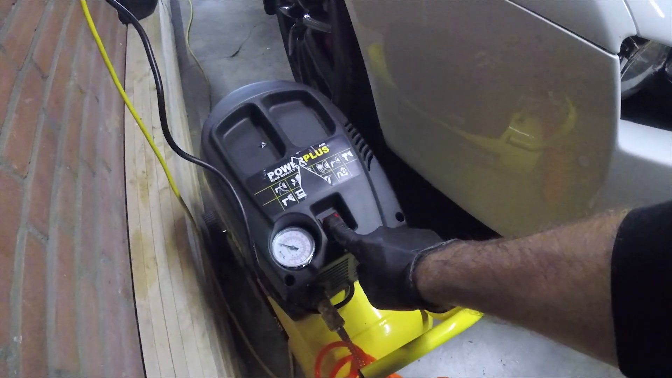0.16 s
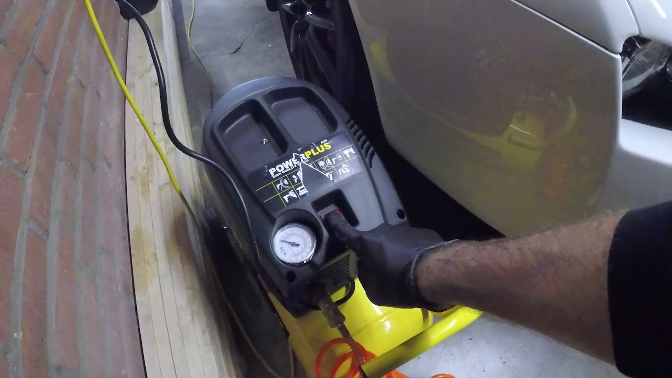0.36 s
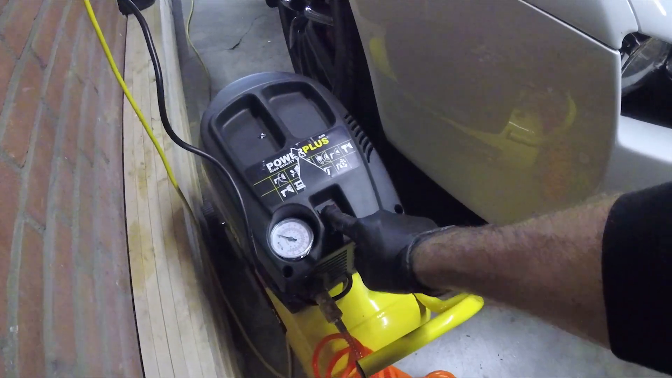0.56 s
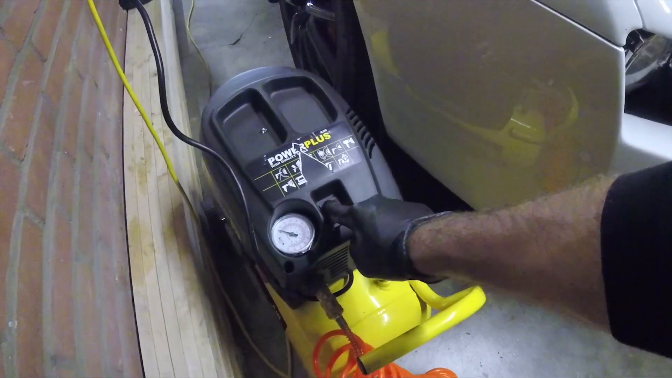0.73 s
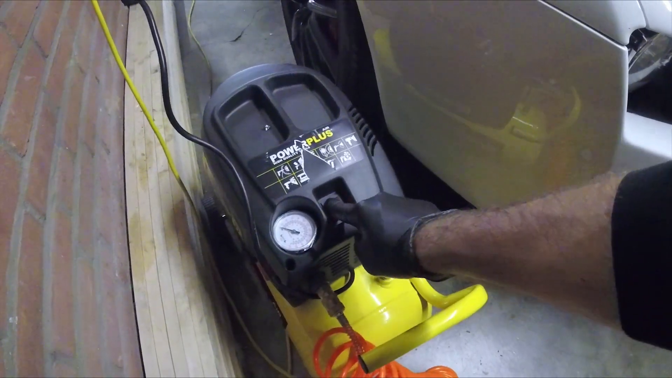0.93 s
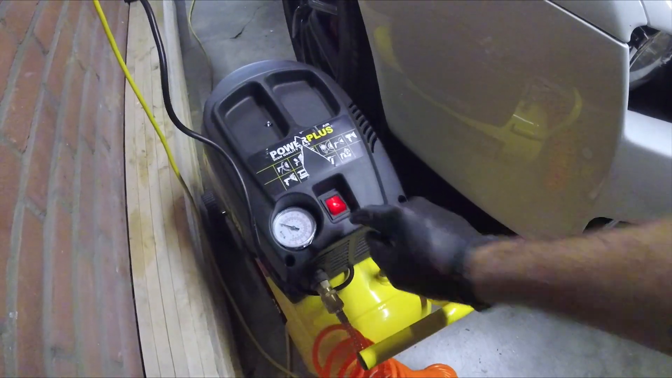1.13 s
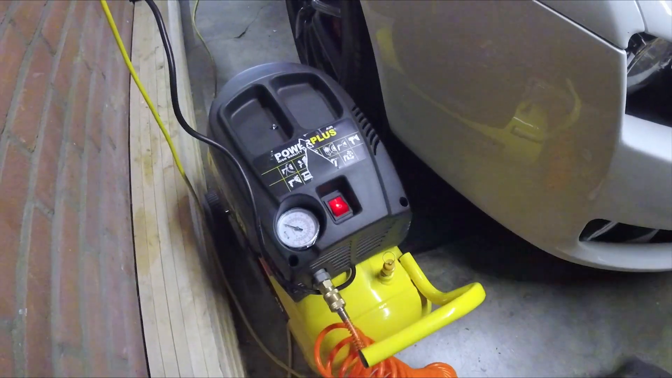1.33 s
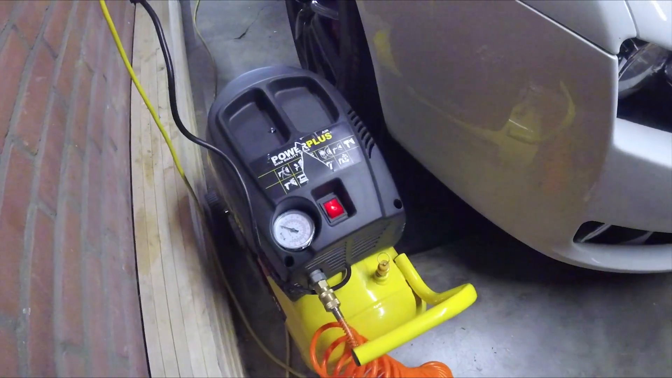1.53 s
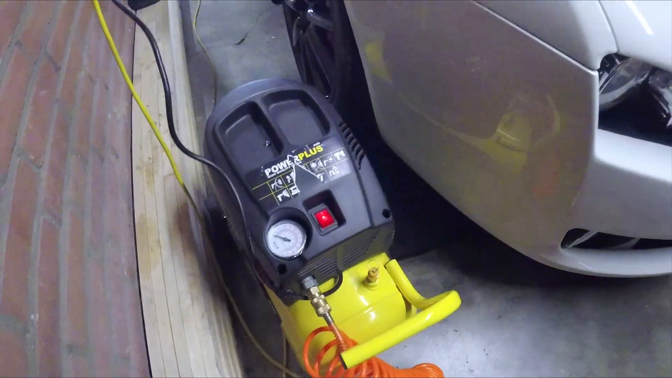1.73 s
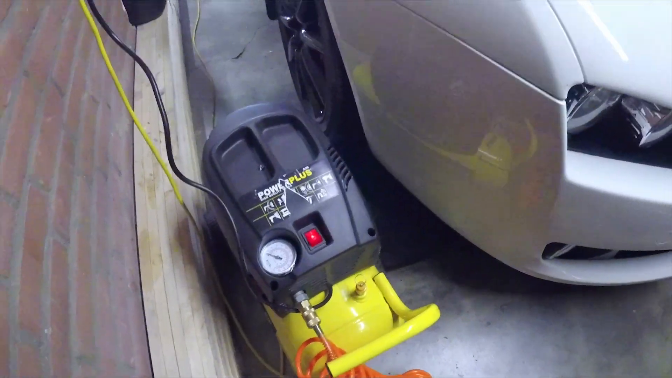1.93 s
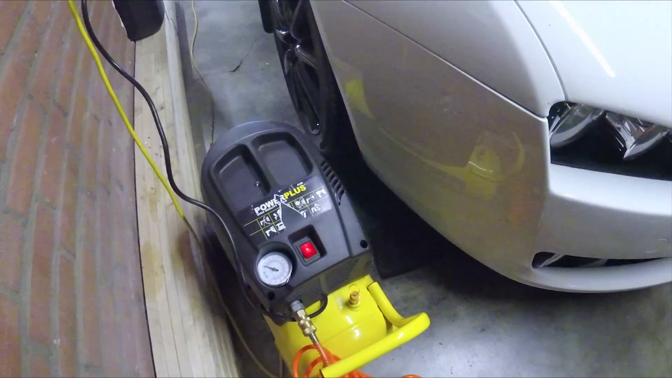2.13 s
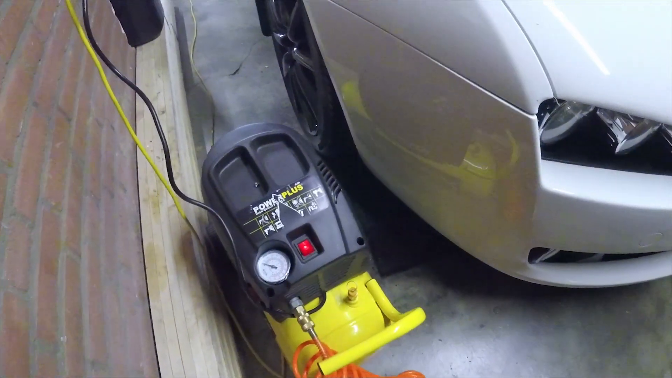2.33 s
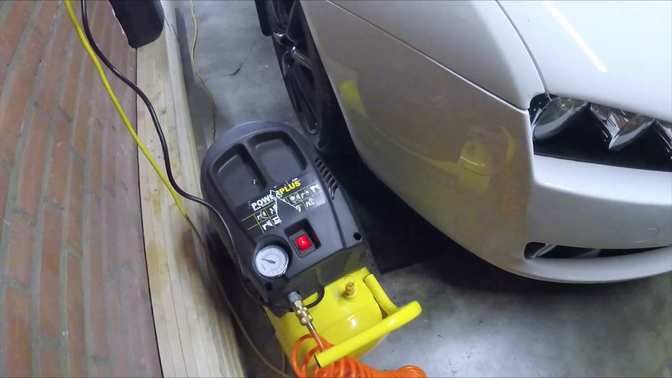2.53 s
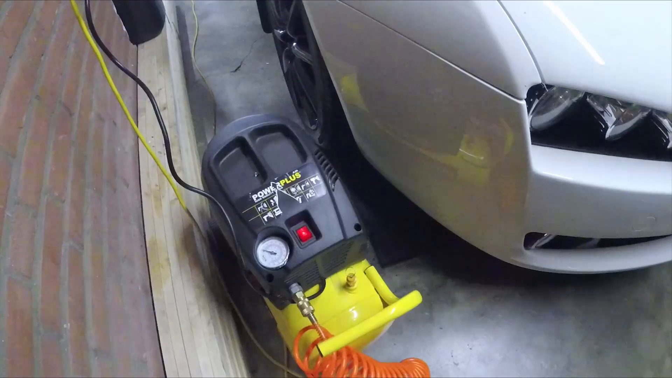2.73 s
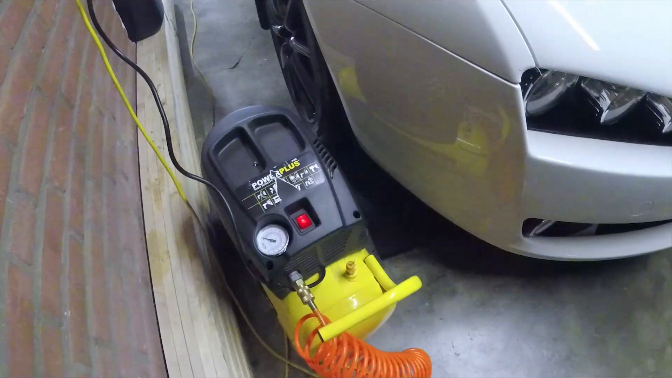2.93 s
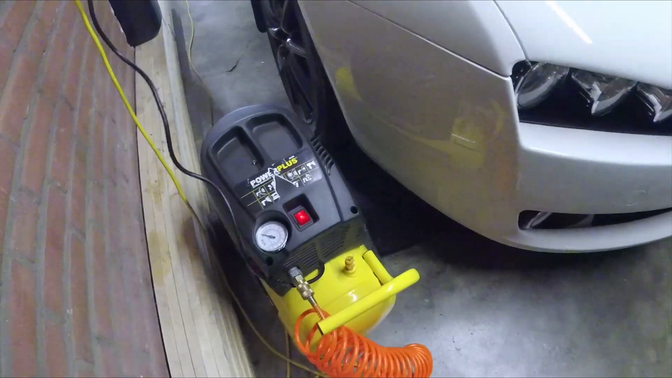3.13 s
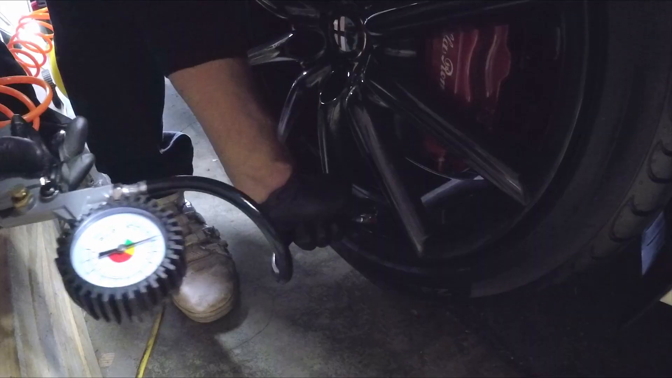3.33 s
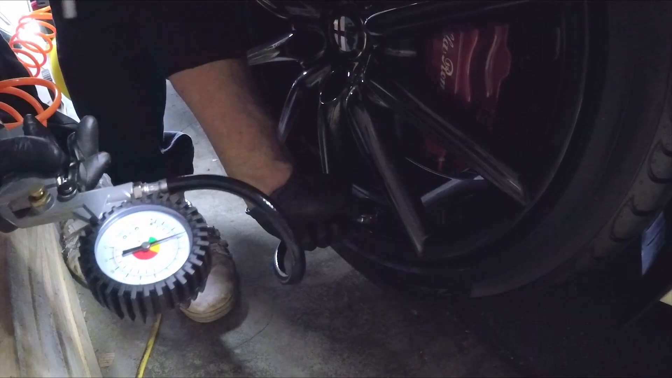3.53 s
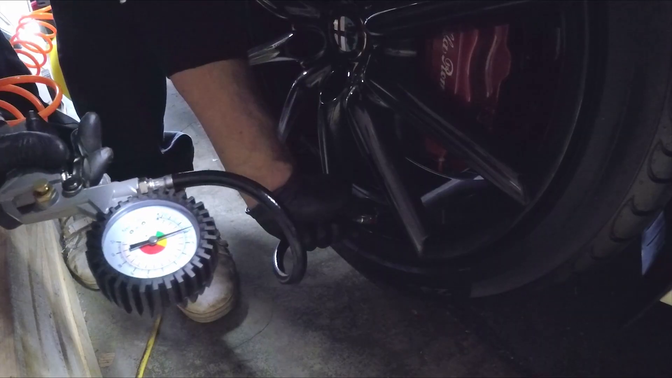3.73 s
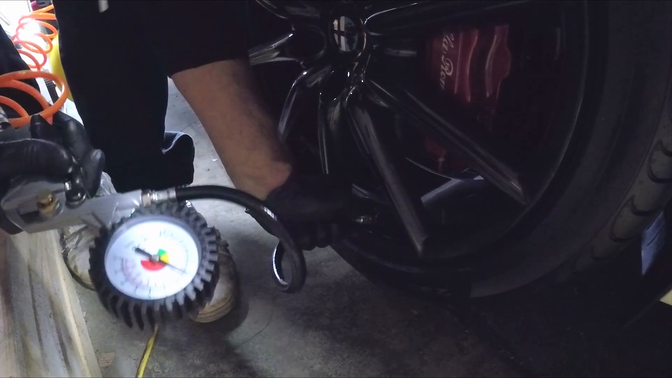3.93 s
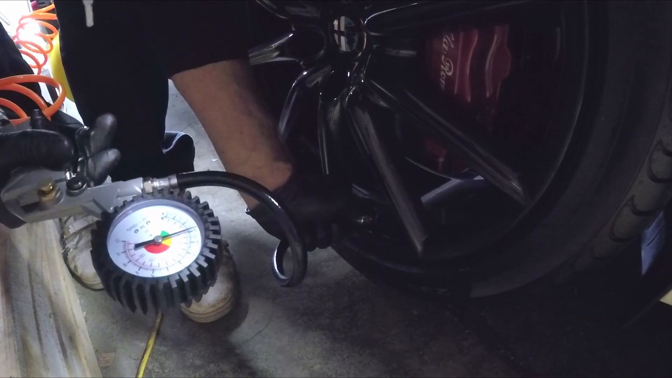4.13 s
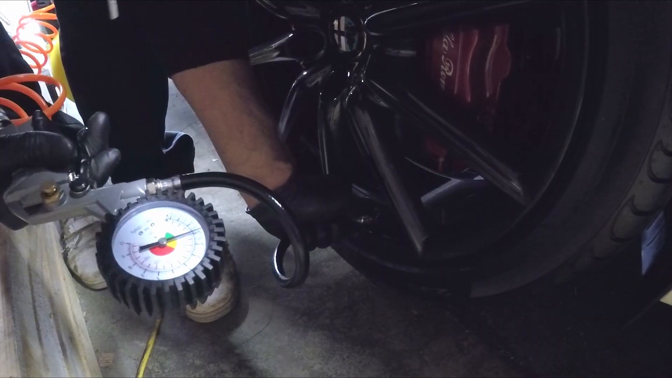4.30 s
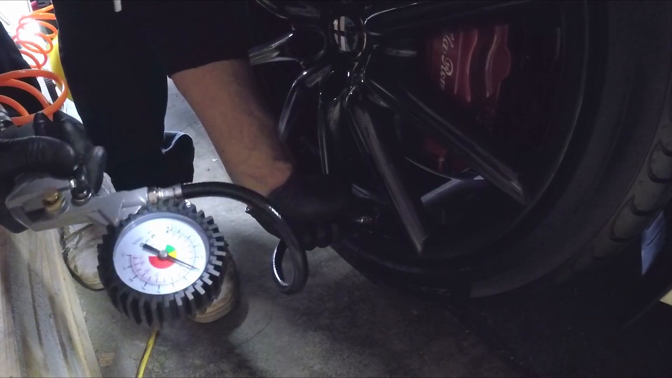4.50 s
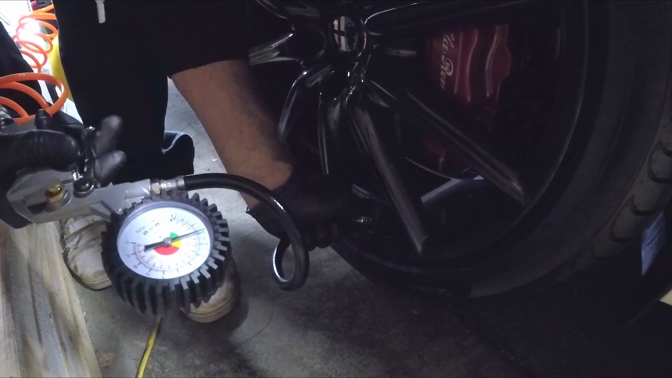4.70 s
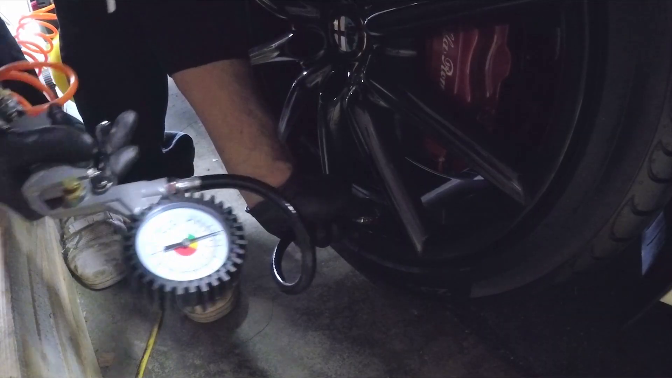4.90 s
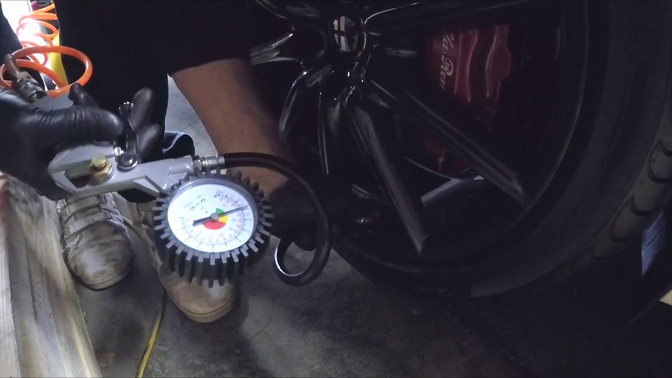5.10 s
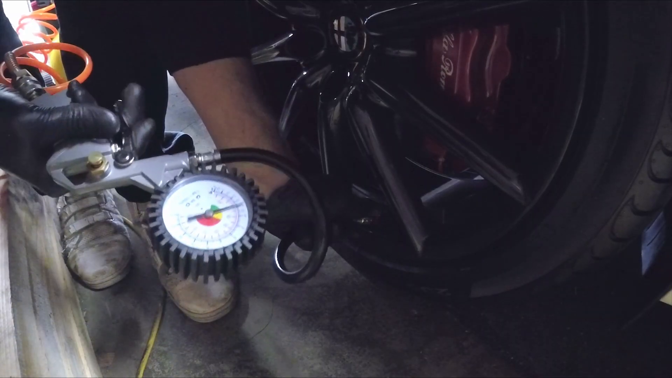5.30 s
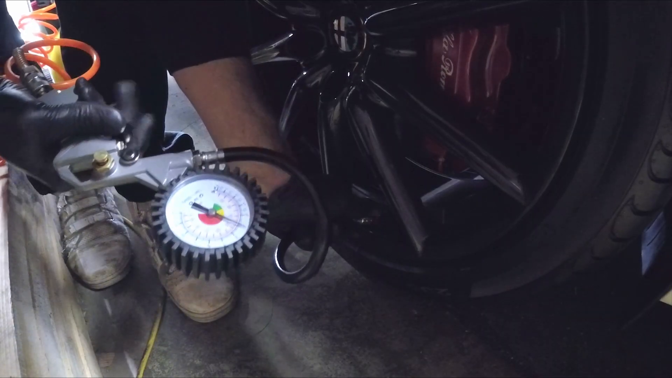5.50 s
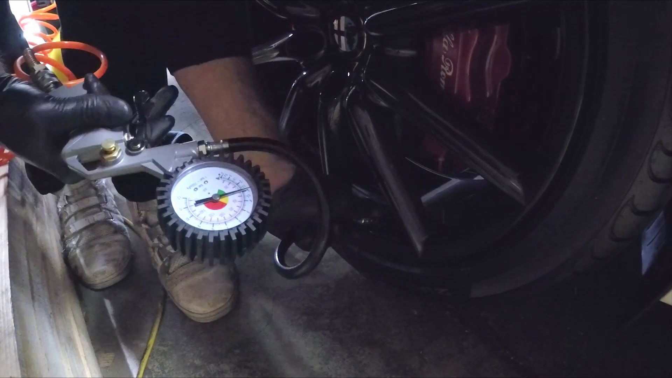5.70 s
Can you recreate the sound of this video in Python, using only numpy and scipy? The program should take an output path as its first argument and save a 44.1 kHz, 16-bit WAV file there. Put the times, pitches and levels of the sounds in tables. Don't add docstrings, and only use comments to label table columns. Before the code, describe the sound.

A gloved hand clicks a switch, a small piston compressor roars into a rattling drone, then cuts abruptly to three short hisses of air into a tyre.

```python
import sys
import numpy as np
from scipy import signal
from scipy.fft import rfft, irfft
from scipy.io import wavfile
from scipy.ndimage import map_coordinates

SR = 44100
rng = np.random.default_rng(int(sys.argv[2]) if len(sys.argv) > 2 else 0)


def elevation(decibels):
    levels = np.asarray(decibels, float)
    return 10 ** (levels / 20)


def unload_wav(signal):
    wavfile.write(
        sys.argv[1],
        SR,
        np.round(np.clip(np.atleast_2d(signal).T, -1, 1) * 32767).astype(np.int16),
    )


N = 253575
TIME = np.arange(N) / SR
START_S, CUT_S = .602, 3.3665


def rms_one(x):
    return x / np.sqrt(np.mean(x ** 2) + 1e-20)


def in_time(rows):
    s, *columns = np.transpose(rows)
    return [np.interp(TIME, s, c) for c in columns]


def level(rows):
    return elevation(in_time(rows)[0]) * (TIME >= rows[0][0]) * (TIME <= rows[-1][0])


def bump(at_s, width_s):
    return np.exp(-((TIME - at_s) / width_s) ** 2)


def drift(rate):
    r = np.exp(-80 * np.pi * rate / SR)
    slow = signal.lfilter([1], [1, -2 * r, r * r], rng.standard_normal(N // 40 + 2002))[2000:]
    return np.interp(np.arange(N) / 40, np.arange(len(slow)), rms_one(slow))


def ring(x, hz, t60):
    r = elevation(-60 / (t60 * SR))
    w = 2 * np.pi * hz / SR
    return signal.lfilter([0, np.sin(w)], [1, -2 * r * np.cos(w), r * r], x + 1e-18)


def narrow(hz, width_hz):
    return rms_one(ring(rng.standard_normal(N), hz, np.log(1000) / (np.pi * width_hz)))


def coloured(spectrum, white=None):
    if white is None:
        white = rng.standard_normal(N)
    hz = np.fft.rfftfreq(N, 1 / SR)[1:]
    points = np.array(spectrum)
    shape = elevation(np.interp(np.log(hz), np.log(points[:, 0]), points[:, 1], left=-90, right=-90))
    return rms_one(irfft(rfft(white) * np.r_[0, shape], N))


def above(x, hz):
    return signal.sosfiltfilt(signal.butter(2, hz, "high", fs=SR, output="sos"), x)


# (frequency [Hz], level [dB per Hz])
RUMBLE_TONES = [
    [(2, 22), (7, 23), (16, -2), (45, 2.5), (80, -2), (125, -20), (250, -25), (600, -48)],
    [(4, 14.5), (9, 8.5), (22, -4), (50, 0), (110, -4), (200, -12.5), (350, -18), (600, -34.5)],
]
# (frequency [Hz], level [dB per Hz])
FLOOR = [(150, -32), (250, -4.5), (330, -9.5), (407, -3.5), (1500, -10), (2020, -11.5), (4820, -15.5),
         (13700, -20.5), (16000, -30.5)]
RUMBLE_DB, HISS_DB = (-50, -68), (-79.5, -74.5)
GUST_S, GUST_LENGTH_S, GUST_DB = 5.53, 0.078, 9
HISS_TOP_HZ = 12100


def garage():
    scenes = [TIME < CUT_S, TIME >= CUT_S]
    rumble = sum(on * elevation(db) * coloured(tone) for on, db, tone in zip(scenes, RUMBLE_DB, RUMBLE_TONES))
    rumble *= elevation(1.1 * drift(10.0) + GUST_DB * bump(GUST_S, GUST_LENGTH_S))
    glove = level([(.395, -74), (.55, -76.5)]) * narrow(610, 70)
    hiss = coloured(FLOOR)
    dull = signal.sosfilt(signal.ellip(6, 1, 40, HISS_TOP_HZ, fs=SR, output="sos"), hiss)
    return rumble + glove + np.where(scenes[0], elevation(HISS_DB[0]) * dull, elevation(HISS_DB[1]) * hiss)


# (time [s], peak level [dB], centre [Hz], t60 [s])
GLOVE = [
    (.007, -48, 2300, 0.018),
    (.217, -58.5, 3380, .035),
    (.2425, -67, 3900, .02),
    (0.392, -43, 2780, 0.029),
    (.398, -57, 2400, .12),
    (.528, -65, 7500, 0.015),
]
# (time [s], peak level [dB], lowest frequency [Hz], rise [s], t60 [s])
SNAPS = [
    (0.551, -25, 1000, .0011, .023),
    (3.787, -39, 2060, 0.0041, 0.043),
]
GLOVE_RISE_S, GLOVE_SPREAD = 0.0011, 1.53


def ticks():
    out = np.zeros(N)
    since = np.arange(SR // 8) / SR
    bursts = [(s, db, hz / GLOVE_SPREAD, hz * GLOVE_SPREAD, GLOVE_RISE_S, t60) for s, db, hz, t60 in GLOVE]
    bursts += [(s, db, low_hz, 15000, rise, t60) for s, db, low_hz, rise, t60 in SNAPS]
    for s, db, low_hz, high_hz, rise, t60 in bursts:
        band = signal.butter(2, [low_hz, high_hz], "band", fs=SR, output="sos")
        noise = signal.sosfilt(band, rng.standard_normal(len(since)))
        shape = np.minimum(since / rise, elevation(-60 * (since - rise) / t60))
        out[round(s * SR):][:len(since)] += elevation(db - 0.5) * shape * noise
    return out


# (time [s], peak level [dB], frequency [Hz], t60 [s])
KNOCKS = [
    (.6, -34, 2450, .2),
    (.662, -29, 2830, .18),
    (3.787, -45, 75, .07),
    (3.79, -52, 200, .04),
    (4.335, -67, 730, .12),
    (4.57, -52, 2540, .52),
    (5.25, -66, 730, .14),
    (5.49, -47.5, 2840, .33),
]
# (time [s], peak level [dB], frequency [Hz])
STOPS = [
    (3.899, -48, 590),
    (4.435, -46.5, 600),
    (5.403, -43.5, 594),
]
STOP_T60_S, STOP_OVERTONE, STOP_OVERTONE_DB = .021, 2.2, -11
KNOCK_RISE_SHARE = .062


def knocks():
    out = np.zeros(N)
    stops = [(s, db, hz, STOP_T60_S) for s, db, hz in STOPS]
    stops += [(s, db + STOP_OVERTONE_DB, hz * STOP_OVERTONE, STOP_T60_S) for s, db, hz in STOPS]
    for s, db, hz, t60 in KNOCKS + stops:
        since = np.maximum(TIME - s, 0)
        rise = np.minimum(since / (KNOCK_RISE_SHARE * t60), 1)
        out += elevation(db - 60 * since / t60) * rise * np.sin(2 * np.pi * hz * since)
    return out


JET_FALL_DB_PER_S, JET_SHOULDER_S = 283, 0.018


def trigger(opens, shuts, db, rise):
    late = JET_SHOULDER_S * np.logaddexp(0, (TIME - shuts) / JET_SHOULDER_S)
    return elevation(db - JET_FALL_DB_PER_S * late) * (1 - np.exp(-np.maximum(TIME - opens, 0) / rise)) ** 2


# (frequency [Hz], width [Hz], level [dB])
WHEEL = [(2540, 26, -15), (2840, 27, -5), (2990, 25, -5), (3220, 23, -7), (3360, 25, -12), (3560, 23, -15),
         (4600, 41, -13), (5150, 56, -13), (5600, 45, -14), (6190, 26, -13), (6830, 160, -10),
         (7320, 39, 0), (7740, 42, -3), (7890, 24, -8), (8230, 32, -3), (8600, 21, -7), (8760, 70, -6),
         (9180, 30, -11), (9870, 57, -13), (10500, 140, -15), (11100, 38, -16), (11600, 34, -12),
         (12100, 45, -9), (12800, 54, -15), (13200, 37, -18), (13600, 100, -15), (13900, 37, -13),
         (14400, 34, -17)]
LOW_MODES_HZ = 4000


def wheel_modes(flow):
    out = 0
    for hz, width, db in WHEEL:
        t60 = np.log(1000) / (np.pi * (.45 if hz < LOW_MODES_HZ else .8) * width)
        driven = ring(flow * rng.standard_normal(N) * elevation(2.2 * drift(3)), hz, t60)
        out = out + elevation(db) * driven * np.sqrt(width / t60 / SR)
    return out


CROWD_T60_S, CROWD_SPREAD_DB = .2, 4


def tyre_air(jet):
    hz = np.geomspace(2300, 14500, 60) * (1 + .015 * rng.standard_normal(60))
    t60 = CROWD_T60_S * (LOW_MODES_HZ / hz) ** .5 * elevation(CROWD_SPREAD_DB * rng.uniform(-1, 1, 60))
    crowd = sum(ring(jet, f, t) / np.sqrt(t) for f, t in zip(hz, t60))
    return crowd * np.std(jet) / np.std(crowd)


# (opens [s], shuts [s], level [dB], rise [s])
JETS = [
    (3.775, 4.045, -45, 0.044),
    (4.363, 4.624, -46, 0.026),
    (5.285, 5.536, -44.5, 0.034),
]
# (frequency [Hz], level [dB per Hz])
JET = [(530, -50), (900, -23.5), (1920, -19), (2890, -10), (3550, -8.5), (4860, -7.5), (5100, -6),
       (6890, -10), (7490, -0.5), (9770, -9), (14200, -8), (15400, -6), (16000, -41)]
BRIGHT_FROM_HZ, BRIGHT_SHARE = 9500, .35


def inflator():
    flow = sum(trigger(*pull) for pull in JETS)
    jet = flow * coloured(JET) * elevation(0.9 * drift(40))
    hiss = elevation(-5.5) * jet + elevation(-7.5) * tyre_air(jet) + elevation(-7) * wheel_modes(flow)
    return hiss - above(hiss, BRIGHT_FROM_HZ) * (1 - (flow / flow.max()) ** BRIGHT_SHARE)


def window(angle, start, length, edge):
    since = (angle - start) % 1
    return np.clip(np.minimum(since, length - since) / edge, 0, 1)


def strikes(turns, at, uneven_db):
    passed = np.diff(np.floor(turns - at), prepend=np.floor(turns[0] - at)) > 0
    return passed * elevation(uneven_db * rng.standard_normal(N))


def each_turn(turns):
    return rng.standard_normal(int(turns[-1]) + 1)[turns.astype(int)]


RUNNING_SPEED, FAST_LAG, FAST_S, SLOW_LAG, SLOW_S = 65.18, 29.5, .084, 3.3, .58
FEET_DRAG, FEET_DRAG_AT_S, FEET_DRAG_S = 1.7, .85, .095


def crank_speed():
    since = np.maximum(TIME - START_S, 0)
    speed = RUNNING_SPEED - FAST_LAG * np.exp(-since / FAST_S) - SLOW_LAG * np.exp(-since / SLOW_S)
    return speed - FEET_DRAG * bump(FEET_DRAG_AT_S, FEET_DRAG_S)


SHAKE_DB, SHAKE_DB_PER_OCTAVE, SHAKE_START_DB = -32, 10.5, -6.5
FEET_DB, FEET_AT_S, FEET_S = 5, .835, 0.13


def body_shake(turns, speed, first):
    db = SHAKE_DB + SHAKE_DB_PER_OCTAVE * np.log2(speed / RUNNING_SPEED)
    db += FEET_DB * bump(FEET_AT_S, FEET_S) + SHAKE_START_DB * first
    return elevation(db + 5.5) * np.sin(2 * np.pi * (turns + .04))


INTAKE_T60_S = 0.21
INTAKE_HZ, INTAKE_RISE_HZ, INTAKE_RISE_S = 422.5, 45, .085


def intake_ring(turns, since_open, valve_open):
    hz = INTAKE_HZ - INTAKE_RISE_HZ * np.exp(-np.maximum(TIME - START_S, 0) / INTAKE_RISE_S)
    gain = elevation(7.0 - 60 * since_open / INTAKE_T60_S + .5 * each_turn(turns))
    tone = gain * np.sin(2 * np.pi * hz * since_open)
    return signal.lfilter(*signal.iirnotch(585, 8, fs=SR), tone * valve_open)


FLUTTER_HZ, FLUTTER_RISE_HZ, FLUTTER_RISE_S = 850, 112, .13
FLUTTER_DB, FLUTTER_DB_PER_S, FLUTTER_SEATED_DB = -25.5, -56, -61
RATTLE_DB, RATTLE_SEATED_DB = -32, -46
SEATED_FROM_S, SEATED_BY_S = .86, 0.98


def reed_flutter(turns, since_open):
    since = np.maximum(TIME - START_S, 0)
    seated = np.clip((TIME - SEATED_FROM_S) / (SEATED_BY_S - SEATED_FROM_S), 0, 1)
    flutter_db = (1 - seated) * (FLUTTER_DB + FLUTTER_DB_PER_S * since) + seated * FLUTTER_SEATED_DB
    rattle_db = (1 - seated) * RATTLE_DB + seated * RATTLE_SEATED_DB
    hz = FLUTTER_HZ - FLUTTER_RISE_HZ * bump(START_S, FLUTTER_RISE_S)
    phase = 2 * np.pi * hz * since_open + 0.38 * each_turn(turns)
    flutter = elevation(flutter_db + 2.5 + 1.1 * drift(60)) * np.sin(phase)
    rattle = narrow(750, 220) + .8 * narrow(1030, 250) + .5 * narrow(300, 150)
    return flutter + elevation(rattle_db) * rattle


# (multiple of crank speed, level [dB against intake ring])
PUSH = [(2, -6), (3, -21.5), (4, -6.5)]


def pressure_push(turns):
    return sum(elevation(db + 0.51 * drift(1.8)) * np.sin(2 * np.pi * k * (turns + 0.0033)) for k, db in PUSH)


# (multiple of crank speed, level [dB])
SNAP = [(8, -10), (10, -11), (11, -10), (12, -9.5), (13, -6.5), (14, -3.5), (15, -6.5), (16, -15),
        (17, -37), (18, -26), (19, -13)]


def valve_snap(turns):
    out = 0
    for k, db in SNAP:
        phase = 2 * np.pi * k * (turns - .625) - .9 + 0.49 * drift(5.5)
        out = out + elevation(db - 4.0 + 1.0 * drift(2.0)) * np.cos(phase)
    return out


# (frequency [Hz], level [dB], t60 [s])
CASING = [(1013.8, 2.5, 0.059), (1338, -1, 0.077), (1489, -5, 0.057), (1847, -7.5, 0.035)]
SHUT_AT_TURNS = .6


def casing_knock(turns):
    return sum(elevation(db) * ring(strikes(turns, SHUT_AT_TURNS, 2.0), hz, t60) for hz, db, t60 in CASING)


# (frequency [Hz], level [dB per Hz])
CLATTER = [(30, -24.5), (70, -18), (160, -25.5), (320, -13.5), (560, -10), (740, -8), (820, -19.5),
           (1000, -17), (1250, -9), (1550, -13), (2200, -16.5), (5000, -24.5), (10500, -31), (16000, -29)]
# (frequency [Hz], width [Hz], level [dB])
WHINES = [(3690, 45, -22), (3330, 350, -14), (4000, 350, -17), (8000, 1800, -14), (14150, 350, -23)]
DULL_START_S, DULL_ABOVE_HZ, DULL_SHARE = .2, 9500, .55


def mechanical_clatter():
    clatter = coloured(CLATTER)
    clatter += sum(elevation(db + 3.1 * drift(1.1)) * narrow(hz, width) for hz, width, db in WHINES)
    return clatter - DULL_SHARE * bump(START_S, DULL_START_S) * above(clatter, DULL_ABOVE_HZ)


def contacts(turns, turns_alike):
    surface = rng.standard_normal((40, 680))
    return map_coordinates(surface, [turns / turns_alike % 39, turns % 1 * 680], order=1, mode="wrap")


def repeated_clatter(turns):
    high = signal.butter(4, 2500, "high", fs=SR, output="sos")
    rough = signal.sosfilt(high, contacts(turns, turns_alike=9.0))
    return elevation(-7) * coloured(CLATTER, rough * (1 + window(turns, .55, .35, .05)))


BEARING_HZ, BEARING_WIDTH_HZ, BEARING_DB, BEARING_AT_S, BEARING_S = 3655, 55, -45.5, 1.32, .3


def bearing_whine():
    gain = elevation(BEARING_DB + 2.0 * drift(13)) * bump(BEARING_AT_S, BEARING_S)
    return gain * narrow(BEARING_HZ, BEARING_WIDTH_HZ)


LIFT_SQUEAK_DB, LIFT_START_DB, LIFT_START_S = -48, -18, .065
HALO_HZ, HALO_RISE_HZ, HALO_RISE_S = 14250, 900, .7
HALO_DB, HALO_START_DB, HALO_START_S = -6.5, -20, .13


def warming_squeak(turns):
    since = np.maximum(TIME - START_S, 0)
    hz = HALO_HZ - HALO_RISE_HZ * np.exp(-since / HALO_RISE_S) + 60 * drift(4)
    tone = np.sin(2 * np.pi * np.cumsum(hz) / SR + 1.2 * drift(150))
    db = LIFT_SQUEAK_DB + 11.5 + HALO_DB + HALO_START_DB * bump(START_S, HALO_START_S) + 2.0 * drift(2)
    return elevation(db) * tone * window(turns, .61, .4, .05)


# (time [s], level [dB])
SQUEAK = [(.6, -61.5), (.79, -52.5), (.89, -42.5), (1.15, -41), (1.54, -46.5), (1.7, -40), (2.95, -37.5),
          (3.06, -41.5), (3.36, -39)]
SQUEAK_HZ, SQUEAK_WANDER_HZ = 13300, 25


def seal(turns, speed):
    upstroke_db, = in_time(SQUEAK)
    lift_db = LIFT_SQUEAK_DB + LIFT_START_DB * bump(START_S, LIFT_START_S) + 2.0 * drift(3)
    hz = SQUEAK_HZ + SQUEAK_WANDER_HZ * drift(1.5)
    loose = np.interp(TIME, [1.5, 1.7], [1.3, .5])
    out = 0
    for db, start, length, edge in [(upstroke_db, .61, .26, .03), (lift_db, .95, .3, .06)]:
        since = (turns - start) % 1 / speed
        phase = 2 * np.pi * hz * since * (1 + .6 * (since - .002))
        phase += loose * drift(25) + .3 * drift(300)
        gain = elevation(db + 9 + 1.6 * drift(200))
        out = out + gain * window(turns, start, length, edge) * np.sin(phase)
    return out + warming_squeak(turns) + elevation(upstroke_db - 12) * narrow(13300, 300)


# (time [s], level [dB])
STIR = [(0.556, -38.5), (0.562, -44.5), (0.594, -38.5), (0.6, -29.5)]
OPEN_TURNS = 0.728
INTAKE_DB, INTAKE_START_DB, NOISE_DB, NOISE_START_DB, FIRST_TURNS_S = -25.5, -2, -36, 1, .06


def compressor():
    speed = crank_speed()
    turns = np.cumsum(speed * (TIME >= START_S)) / SR
    running = turns > 0
    first = np.exp(-np.maximum(TIME - START_S, 0) / FIRST_TURNS_S)
    opened = np.diff(np.ceil(turns), prepend=0) > 0
    since_open = TIME - np.maximum.accumulate(TIME * opened)
    valve_open = window(turns, 0, OPEN_TURNS, 0.027)
    pump = intake_ring(turns, since_open, valve_open) + pressure_push(turns) + valve_snap(turns)
    pump += elevation(-7.0) * casing_knock(turns)
    pump *= elevation(INTAKE_DB + INTAKE_START_DB * first - 0.5)
    pump += reed_flutter(turns, since_open) * valve_open
    clatter = mechanical_clatter()
    noise_gain = (TIME > .598) * elevation(NOISE_DB + NOISE_START_DB * first + 2.5)
    whole = running * (pump + body_shake(turns, speed, first) + seal(turns, speed) + bearing_whine())
    whole += noise_gain * (clatter + repeated_clatter(turns))
    return (whole + level(STIR) * clatter) * (TIME < CUT_S)


def scene():
    return (garage() + ticks() + knocks() + inflator() + compressor())[None]


def low_pass(x):
    return signal.sosfilt(signal.butter(12, 16510, fs=SR, output="sos"), x)


def record(dry):
    step = signal.ellip(10, .5, 40, 15270, fs=SR, output="sos")
    top = signal.ellip(10, .5, 50, 15830, fs=SR, output="sos")
    return low_pass(signal.sosfilt(top, signal.sosfilt(step, dry)))


dry = scene()
out = record(dry)
unload_wav(out)
```